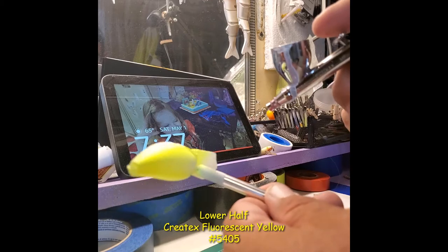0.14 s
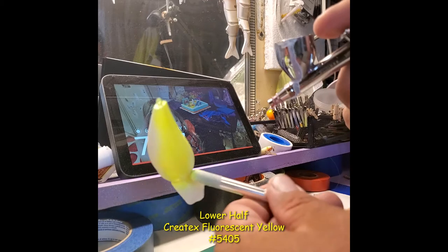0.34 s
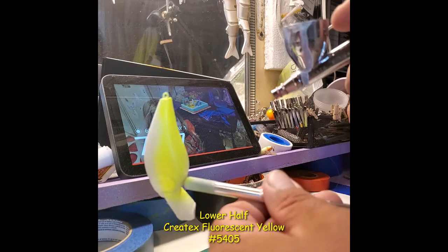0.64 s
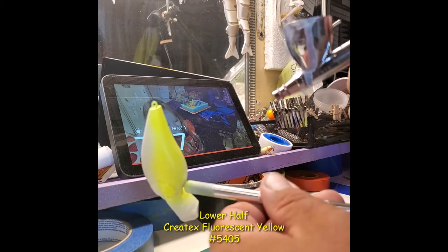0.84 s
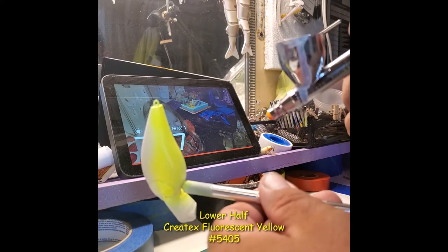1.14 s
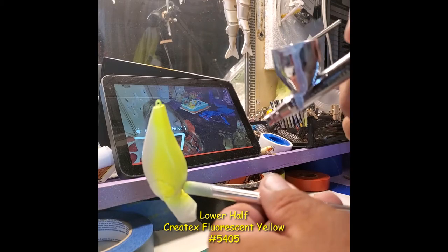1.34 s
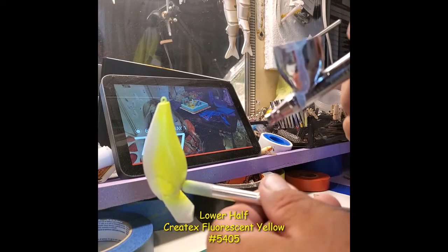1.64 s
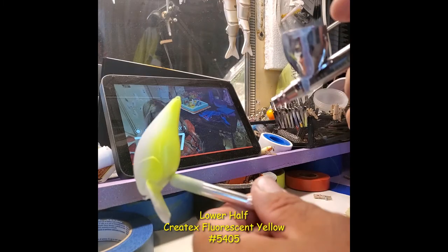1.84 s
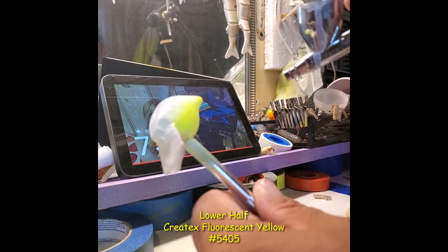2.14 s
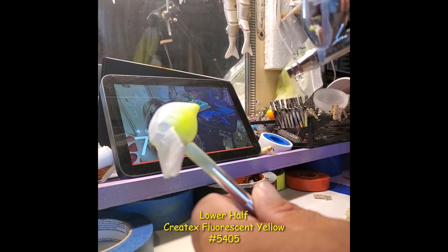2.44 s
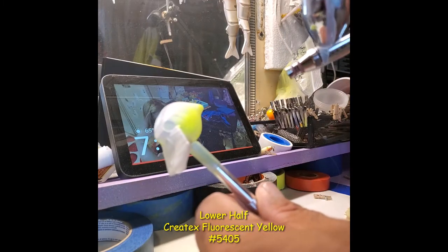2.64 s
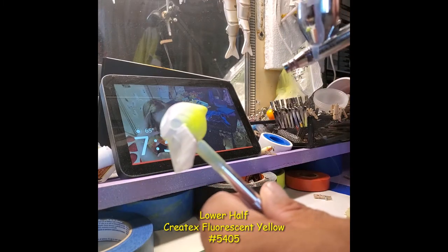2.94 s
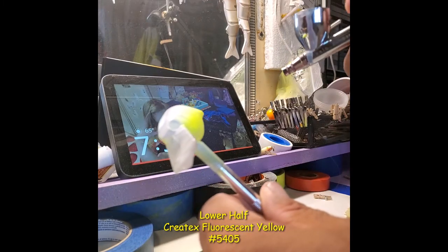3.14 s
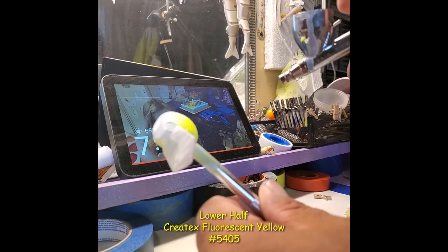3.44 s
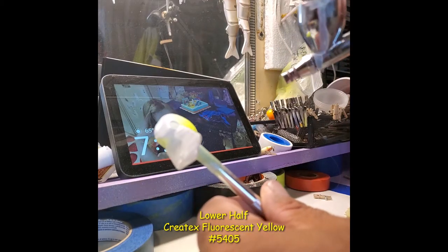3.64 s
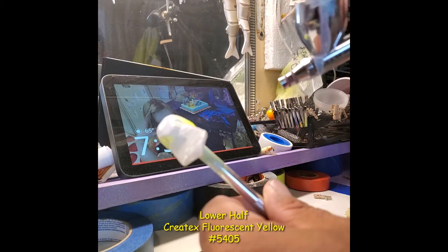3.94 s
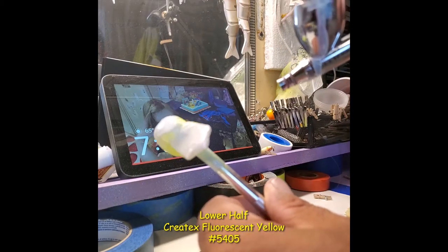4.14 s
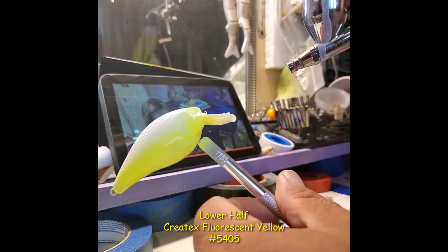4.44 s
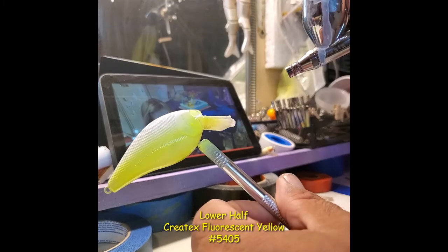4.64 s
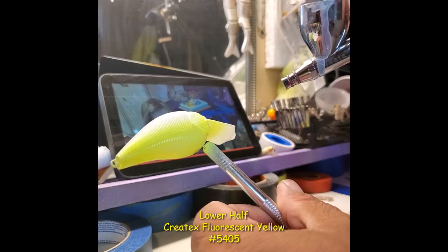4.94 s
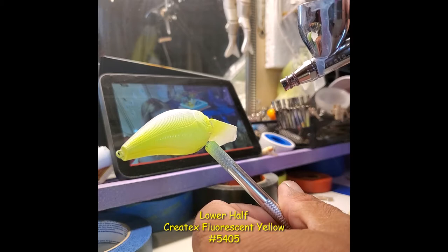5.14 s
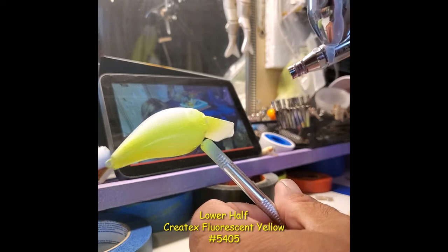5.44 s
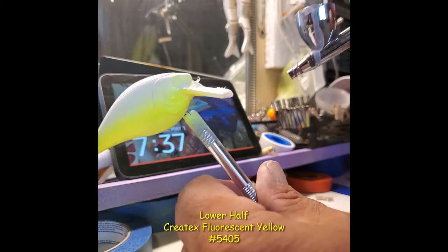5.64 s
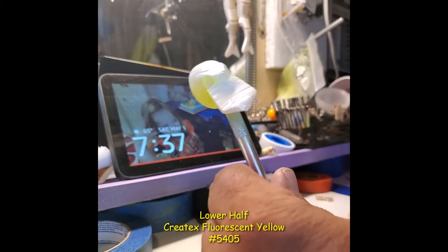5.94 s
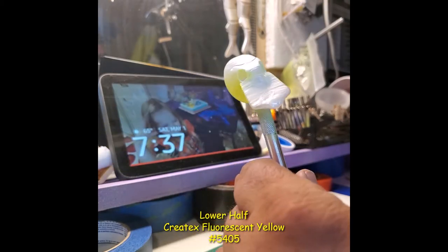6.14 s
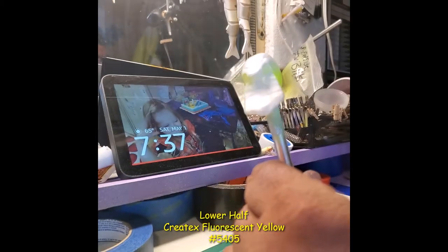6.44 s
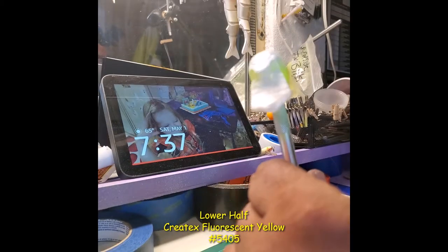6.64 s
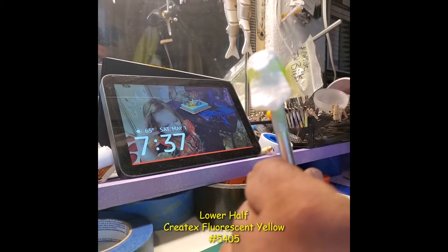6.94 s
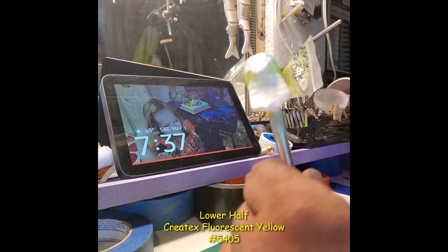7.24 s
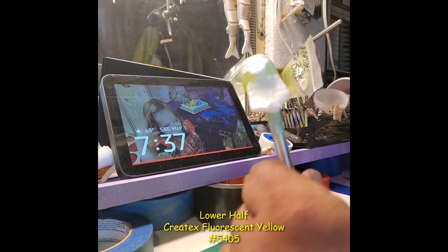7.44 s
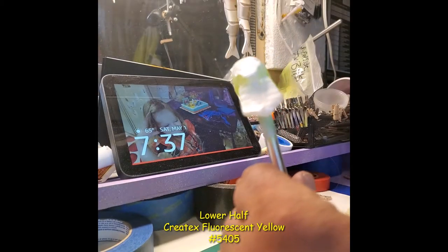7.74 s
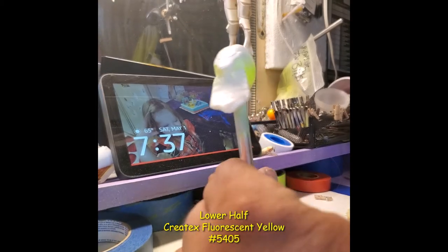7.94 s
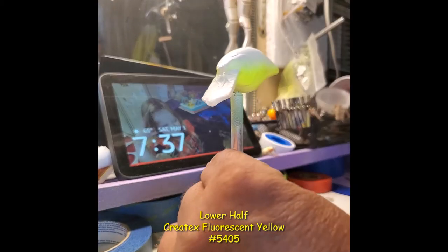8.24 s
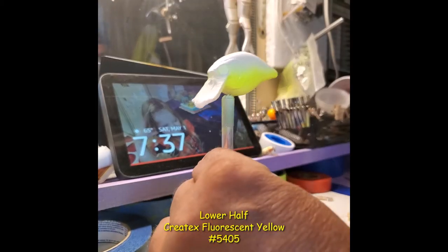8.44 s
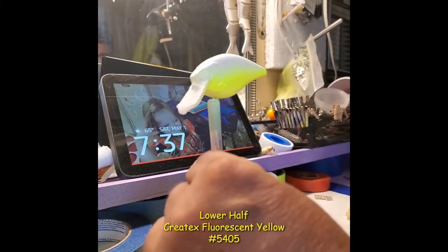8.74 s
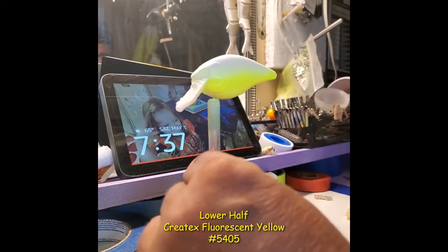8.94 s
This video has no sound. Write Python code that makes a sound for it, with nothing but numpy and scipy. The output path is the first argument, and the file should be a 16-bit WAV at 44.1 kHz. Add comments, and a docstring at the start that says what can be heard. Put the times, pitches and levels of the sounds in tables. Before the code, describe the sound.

At a quiet indoor workbench, an airbrush sprays a small lure in four bright hissing bursts, each starting thin then opening fuller, with a soft airy roar and a snap at release. A small compressor hums low and cuts in and out. Loose metal ticks rattle between sprays; later the brush knocks hard into its holder, followed by light dry finger taps. Close stereo microphone.

```python
"""At a workbench an airbrush sprays a fishing lure in four bursts, each first air alone, then opened wider.
Turbulent-jet noise gives the hiss, with echo combs, and a soft roar where the stream meets the lure.
A small piston compressor runs three times as harmonics of its stroke rate, with a rumble as it stops.
Damped modes and noise cracks make the trigger snaps, ticking metal, small clinks, finger taps and bumps.
The brush is knocked into its holder on the right; skin rubs on the lure's stick in a quiet room."""
import sys
import numpy as np
from scipy import signal
from scipy.fft import rfft, irfft
from scipy.io import wavfile

SR = 44100
rng = np.random.default_rng(int(sys.argv[2]) if len(sys.argv) > 2 else 0)


def master_out(mix):
    """Clip the mix to full scale and print it as 16-bit PCM to the path in sys.argv[1]."""
    frames = np.transpose(np.atleast_2d(mix))
    ceiling = np.clip(frames, -1, 1)
    pcm = np.round(ceiling * 32767).astype(np.int16)
    wavfile.write(sys.argv[1], SR, pcm)


N = 401310
TIME = np.arange(N) / SR

# Table levels are relative: each function applies its own gains. Balance is left minus right.
# direction of the hiss: f/Hz, balance/dB
JET_PAN = [(60, -2), (110, -8.5), (200, -4), (380, -8.5), (1290, -10), (2380, -6.5), (4400, -6.5),
           (8120, 4), (15000, 14)]
# spectrum of the pump on its feet: f/Hz, density level/dB
MOUNT = [(20, -3), (45, 5), (90, -4), (165, 0), (240, 3.5), (340, -21.5), (560, -9), (850, -18),
         (4000, -55)]
# spectrum of metal contacts: f/Hz, density level/dB
TICK_COLOUR = [(1060, -34), (1800, -21), (2860, -17), (4310, -11.5), (5610, -5.5), (7430, -14.5),
               (8750, -10.5), (10700, -12.5), (14700, -7)]
# how the hand holds the metal: from t/s, ring level/dB, T60/s, body level below 4500 Hz/dB, three modes f/Hz
GRIPS = [(.3, -5.5, 0.025, -5, 2870, 11600, 15000), (1.7, -0.5, 0.02, -2.5, 8870, 13600, 11200),
         (4.0, -1.5, 0.032, -7.5, 5590, 8840, 15000), (5.7, -5.5, 0.085, 1.5, 5717, 10100, 13150)]
# metal parts slide in the hand: start t/s, end t/s, level/dB
SLIDES = [(0.331, 0.525, -49), (1.878, 2.205, -47), (4.323, 4.375, -37.5), (4.424, 4.81, -45.5),
          (6.082, 6.224, -48.5), (6.48, 6.63, -46.5), (8.649, 8.697, -56), (8.792, 8.948, -59.5)]
# skin and sleeve rub on the stick: start t/s, end t/s, swish level/dB, crackle relative to swish/dB
RUBS = [(5.623, 5.795, -40.5, -12.5), (5.742, 5.962, -37.5, -14), (7.83, 8.52, -57, 2),
        (7.985, 8.397, -54.5, -1.5)]
# spectrum of dry cracks: f/Hz, density level/dB
TAP_COLOUR = [(300, -21.5), (700, -8), (970, -21), (1350, -8.5), (1800, -6.5), (3000, -4), (3900, -6),
              (4700, -0.5), (7500, -14.5), (10900, -10.5), (15800, -19)]
# modes of the stick: f/Hz, level/dB, T60/s
TAP_MODES = [(1364, -5, 0.054), (2910, -1, 0.043)]


def from_db(db):
    """Level to amplitude: 20 dB is a factor of ten."""
    return 10 ** (np.asarray(db) / 20)


def rms_one(x):
    """Normalisation to unit root-mean-square amplitude."""
    return x / np.sqrt(np.mean(x ** 2) + 1e-20)


def at_hz(points, hz):
    """Spectrum interpolated linearly in dB on a logarithmic frequency axis."""
    f, value = np.transpose(points)
    return np.interp(np.log(hz + 1e-3), np.log(f), value)


def pan(db):
    """Constant-power panning: gains of the left and right channels."""
    db = np.atleast_1d(db)
    gains = from_db(np.array([db, -db]) / 2)
    return gains / np.sqrt(np.mean(gains ** 2, axis=0))


def drift(rate_hz):
    """Low-passed random process of unit rms, 6 dB down at rate_hz."""
    f = np.fft.rfftfreq(N, 1 / SR)
    return rms_one(irfft(rfft(rng.standard_normal(N)) / (1 + (f / rate_hz) ** 2), N))


def noise(colour, balance=None, n=N, tilt_db=0):
    """Partly coherent stereo noise, shaped in frequency; the tilt is in dB per octave above 500 Hz."""
    # left-right coherence: f/Hz, correlation
    likeness = [(60, 0.13), (250, 0.76), (600, 0.67), (1200, 0), (4000, 0.033)]
    f = np.fft.rfftfreq(n, 1 / SR) + 1
    alike = at_hz(likeness, f)
    mid, side = rfft(rng.standard_normal((2, n)))
    pair = np.sqrt(1 + alike) * mid + np.sqrt(1 - alike) * side * [[1], [-1]]
    if balance is not None:
        pair = pair * pan(at_hz(balance, f))
    shape_db = at_hz(colour, f) + tilt_db * np.log2(np.maximum(f, 500))
    return rms_one(irfft(pair * from_db(shape_db), n))


def dying(t, t60):
    """Exponential damping: 60 dB of decay in t60 seconds."""
    return np.exp(-np.minimum(np.log(1000) * t / max(t60, 1e-4), 40))


def movement(start, end, rise_t60, fade_t60, t=TIME):
    """First-order onset and release: the gain approaches one, holds and decays."""
    return (1 - dying(np.maximum(t - start, 0), rise_t60)) * dying(np.maximum(t - end, 0), fade_t60)


def aim(s, width_s):
    """Gaussian weighting in time, 6 dB down at width_s from its top."""
    return .5 ** np.minimum(((TIME - s) / width_s) ** 2, 20)


def ring(modes, t, spread_db=2):
    """Modal superposition: damped sines with a random strength and sign in each ear."""
    shape = (len(modes), 2, 1)
    strength = from_db(rng.normal(0, spread_db, shape)) * rng.choice([-1, 1], shape)
    # long waves reach both ears alike
    long_wave = np.array(modes)[:, :1] < 900
    strength[:, 1] = np.where(long_wave, strength[:, 0], strength[:, 1])
    return sum(gain * from_db(db) * np.sin(2 * np.pi * hz * t) * dying(t, t60)
               for gain, (hz, db, t60) in zip(strength, modes))


def add(out, s, sound):
    """Linear superposition of a sound from time s."""
    start = int(s * SR)
    out[:, start:start + sound.shape[1]] += sound[:, :N - start]


def strikes(rows, colour, modes, crack_db, crack_t60, ring_db, room_db, room_t60,
            rise_t60=0.0018, patchy_db=4.5, detune=0.0064):
    """Impact excitation: a broadband crack, free modal ringing and a faint diffuse room tail."""
    out, t = np.zeros((2, N)), TIME[:2 ** 13]
    for s, level_db, side_db in rows:
        own_colour = [(hz, db + patchy_db * rng.standard_normal()) for hz, db in colour]
        burst = noise(own_colour, n=len(t))
        crack = from_db(crack_db) * burst * dying(t, crack_t60)
        # stretching time shifts pitch and decay together
        ringing = from_db(ring_db) * ring(modes, t * (1 + detune * rng.standard_normal()))
        tail = from_db(room_db) * burst * dying(t, room_t60)
        sound = (crack + ringing) * pan(side_db) + tail * pan(side_db / 2)
        add(out, s, from_db(level_db) * (1 - dying(t, rise_t60)) * sound)
    return out


def airbrush(jet_db=6.0, buffet_db=1, flutter_db=1.0, bounce=0.56, bounce_s=0.000677, close_t60=0.052,
             open_t60=0.011, gust_db=1.5, thin_db=-3.5, bench_echo=0.37, bench_s=0.0019, wall_s=0.0067):
    """Turbulent-jet noise: a two-stage hiss, comb-filtered by echoes, and a roar of impinging flow."""
    # trigger pulls: air on t/s, opened wide t/s, released t/s, first level/dB, wide level/dB
    bursts = [(.683, .903, 1.721, -38, -30), (2.313, 2.673, 3.132, -34.3, -29.2),
              (3.623, 3.866, 4.162, -38.8, -29.2), (4.819, 5.168, 5.428, -32.8, -28.4)]
    # hiss spectrum: f/Hz, density level/dB
    jet_colour = [(1290, -70), (2150, -36), (2480, -11.5), (2700, -16.5), (2880, -8), (3060, -14),
                  (3400, -5.5), (4100, -7), (4600, -13), (5000, -7), (9500, -6.5), (14000, 0.5),
                  (15100, 6.5), (15700, 2.5)]
    # roar spectrum: f/Hz, density level/dB
    buffet_colour = [(59, -30.5), (100, -3.5), (296, -0.5), (620, -0.5), (1090, -8), (1350, -3),
                     (1900, -15), (2470, -35.5), (4180, -120)]
    # rush spectrum: f/Hz, density level/dB
    rush_colour = [(600, -25), (900, -1), (1350, 0.5), (2500, -12), (8000, -33.5)]
    # the air cone sweeps over the lure, deepest on its broad flank, brightest on its edge:
    # best aim t/s, roar level/dB, 6 dB half-width/s (sign ignored), bass and rush relative to roar/dB
    sweeps = [(.85, -59, -0.04, 12.5, -20), (1.36, -41, 0.51, 0.5, -23), (2.5, -46.5, 0.46, 3.5, -20),
              (4.05, -40.5, 0.2853, -13, -11.5), (4.86, -41, 0.17, -36, -0.5),
              (5.18, -45.5, 0.25, -5.5, -24)]
    flow, air_on, air_only = np.zeros((3, N))
    for on, wide, off, first_db, wide_db in bursts:
        valve = movement(on, off, open_t60, close_t60)
        needle = 1 - dying(np.maximum(TIME - wide, 0), 2 * open_t60)
        flow += valve * from_db(first_db + needle * (wide_db - first_db))
        air_on += valve
        air_only += valve * (1 - needle)
    jet = noise(jet_colour, JET_PAN)
    # an echo off the moving lure and hand sweeps a shallow comb through the hiss
    delay = bounce_s * (1 + 0.191 * drift(0.81))
    echo = np.array([np.interp(TIME - delay, TIME, ear) for ear in jet])
    # fixed echoes off the bench and the wall add a finer ripple
    off_bench = np.roll(jet, int(bench_s * SR), axis=1)
    off_wall = np.roll(jet, int(wall_s * SR), axis=1)
    jet = rms_one(jet + bounce * echo + bench_echo * (off_bench - off_wall))
    impact = sum(from_db(db) * aim(s, width) for s, db, width, _, _ in sweeps)
    depth = sum(from_db(db + bass_db) * aim(s, width) for s, db, width, bass_db, _ in sweeps)
    edge = sum(from_db(db + rush_db) * aim(s, width) for s, db, width, _, rush_db in sweeps)
    # a harder impact fills the lower part of the hiss; air alone is thinner
    band = signal.butter(2, [2300, 4800], "band", fs=SR, output="sos")
    splash = signal.sosfiltfilt(band, jet)
    splash_db = 0.4 * (np.maximum(20 * np.log10(impact), -49) + 47.0) + thin_db * air_only
    jet = jet + splash * (from_db(splash_db) - 1)
    hiss = jet * flow * from_db(jet_db + flutter_db * drift(36))
    eddies = noise(buffet_colour)
    deep = signal.sosfiltfilt(signal.butter(2, 300, fs=SR, output="sos"), eddies)
    roar = (eddies - deep) * impact + deep * depth + noise(rush_colour) * edge
    roar = roar * air_on * from_db(buffet_db + gust_db * drift(21.0))
    return hiss + roar * pan(-5.0)


def compressor(hum_db=-37.5, rattle_db=-49.5, puff_db=-52, whine_db=-50.5, leak_db=-59, throb_db=1.5,
               coast_t60=.24, waver_db=1.0, rumble_db=-56, stroke_spread_db=.5):
    """Periodic excitation: piston strokes yield harmonics, casing rattle and amplitude-modulated puffs."""
    # runs: motor on t/s, full level t/s, motor off t/s, time of one stroke t/s, stroke rate f/Hz
    runs = [(-.6, -.3, .213, .0072, 29.18), (1.27, 1.52, 3.455, 1.466, 29.19),
            (4.88, 5.12, 6.2, 5.068, 29.16)]
    # low throb: multiple of the stroke rate, level/dB
    hum_orders = [(1, -9.5), (2, 4), (3, -0.5), (5, -14), (6, -5.5), (7, -19), (8, -12.5)]
    # casing resonances: f/Hz, density level/dB
    casing_colour = [(200, -11.5), (300, -15), (360, -3), (480, -8.5), (620, 5.5), (760, -2.5), (940, 4),
                     (1130, -12.5), (1300, 2.5), (1500, -1), (1730, 5), (1900, -15), (2600, -13.5),
                     (4500, -28)]
    # whine: multiple of the stroke rate, level/dB
    whine_orders = [(16, -8), (18, -6), (19, -5), (21, 0), (23, -6), (32, -5.5), (59, -10.5)]
    # air leak spectrum: f/Hz, density level/dB
    leak_colour = [(1500, -8), (2800, 3.5), (9000, -10), (15000, -12)]
    running, turn = np.zeros(N), np.zeros(N)
    for on, loaded, off, stroke_s, per_s in runs:
        spin_up = np.clip((TIME - on) / (loaded - on), 0, 1) ** 2
        running += spin_up * dying(np.maximum(TIME - off, 0), coast_t60)
        turn = np.where(TIME > on, 2 * np.pi * per_s * (TIME - stroke_s), turn)
    cycle = np.linspace(0, 2 * np.pi, 2048)

    def each_stroke(orders, scatter):
        """Fourier series over one crank turn, in step (scatter 0) or in any phase (scatter 1)."""
        wave = sum(from_db(db) * np.cos(round(k) * cycle + scatter * rng.uniform(0, 2 * np.pi))
                   for k, db in orders)
        return np.interp(turn % (2 * np.pi), cycle, rms_one(wave))

    panels = [(k, at_hz(casing_colour, k * runs[-1][4])) for k in range(10, 64)]
    rattle = np.array([each_stroke(panels, 0.86), each_stroke(panels, 1)])
    # outlet and intake open in turn
    opening = np.cos(turn - .6) + .5 * np.cos(2 * turn)
    valves = rms_one(from_db(throb_db * opening + drift(7.8)))
    casing = (from_db(rattle_db) * rattle + from_db(puff_db) * noise(casing_colour)) * valves
    whine = from_db(whine_db + waver_db * drift(0.48)) * each_stroke(whine_orders, 1.0)
    leak = from_db(leak_db) * noise(leak_colour, JET_PAN)
    # the throb's level wanders slightly
    hum = from_db(hum_db + stroke_spread_db * drift(8)) * each_stroke(hum_orders, 0)
    rumble = from_db(rumble_db) * noise(MOUNT)
    return running * (hum + rumble + (casing + whine) * pan(-3.5) + leak)


def shudder(rise_t60=0.014, t60=0.33):
    """Damped random vibration: a dull rumble dies away as the pump rocks on its rubber feet."""
    # the pump rocks as it stops: t/s, level/dB
    shudders = [(0.331, -42), (3.572, -41), (6.293, -35.5)]
    out, t = np.zeros((2, N)), TIME[:2 ** 15]
    for s, level_db in shudders:
        envelope = (1 - dying(t, rise_t60)) * dying(t, t60)
        add(out, s, from_db(level_db) * noise(MOUNT, n=len(t)) * envelope * pan(-1.7))
    return out


def valve_snaps():
    """Impact of the trigger valve snapping as it opens or shuts, which excites its damped modes."""
    # snaps, the first on opening, the others on shutting: t/s, level/dB, balance/dB
    snaps = [(0.6933, -32.5, -3), (1.7504, -26, -4), (3.1573, -23, -6.5), (4.1937, -18.5, -9),
             (5.451, -21.5, -11)]
    # modes of the valve: f/Hz, level/dB, T60/s
    valve_modes = [(2880, 4, 0.021), (3230, -2, 0.022), (3550, 6, 0.017), (5700, -19, 0.082),
                   (8780, -12, 0.14)]
    return strikes(snaps, TAP_COLOUR, valve_modes, crack_db=-3.5, crack_t60=0.013,
                   ring_db=-6.5, room_db=-19, room_t60=0.15)


def knocks(rattle_t60=0.079, room_db=-13, room_t60=0.2, rise_t60=0.0025, lowest_hz=80, snap_db=-33):
    """Impulsive modal excitation of the holder, band-limited by how hard the contact is."""
    # the brush lands in its holder: t/s, level/dB, balance/dB, brightness/(dB per octave),
    # top of the contact f/Hz, loose rattle level/dB, level of the mode near 540 Hz/dB
    landings = [(7.019, -10.5, -15, 3, 6630, -10.5, -5), (7.0232, -9, -13.5, -1, 4100, -6, 3.5),
                (7.0266, -17, -10, 0.5, 3010, -5, 2), (7.077, -22.5, -16, 0.5, 6100, -8.5, 1),
                (7.1796, -7.5, -17, -1, 2560, -18, -8)]
    # rattle spectrum: f/Hz, density level/dB
    knock_colour = [(88, -13.5), (170, 0), (545, -8), (1140, -11.5), (1910, -23), (2400, -16.5),
                    (5740, -23.5), (7300, -34)]
    # modes of the holder: f/Hz, level/dB, T60/s
    holder_modes = [(180, -12.5, 0.06), (276, -9.5, 0.04), (541, -2.5, 0.041), (744, -3.5, 0.023),
                    (1310, -3, 0.017), (1680, -10, 0.02), (2330, -8.5, 0.025), (2840, -9.5, 0.017),
                    (3620, -8.5, 0.013), (5020, -5.5, 0.0091), (5750, -6.5, 0.013)]
    out, t = np.zeros((2, N)), TIME[:2 ** 14]
    for s, level_db, side_db, tilt_db, top_hz, rattle_db, hollow_db in landings:
        body = 0
        for k, (hz, db, t60) in enumerate(holder_modes):
            mode_db = db + tilt_db * np.log2(hz / 1000) + hollow_db * (450 < hz < 650)
            # one push wakes all modes together, with alternating signs
            body = body + (-1) ** k * from_db(mode_db) * np.sin(2 * np.pi * hz * t) * dying(t, t60)
        burst = from_db(rattle_db) * noise(knock_colour, n=len(t), tilt_db=tilt_db)
        direct = (body + burst * dying(t, rattle_t60)) * pan(side_db)
        tail = from_db(room_db) * burst * dying(t, room_t60) * pan(side_db / 2)
        contact = signal.butter(3, [lowest_hz, top_hz], "band", fs=SR, output="sos")
        thud = signal.sosfilt(contact, (direct + tail) * (1 - dying(t, rise_t60)))
        # the brush's own metal parts
        snap = from_db(snap_db + 2 * tilt_db + rattle_db / 2) * noise(TICK_COLOUR, n=len(t))
        snap = snap * dying(t, rattle_t60) * pan(side_db / 2)
        add(out, s, from_db(level_db) * (thud + snap))
    return out


def grip_at(s):
    """Piecewise-constant boundary condition: the grip in force at time s."""
    return GRIPS[max(sum(row[0] <= s for row in GRIPS) - 1, 0)]


def ticks(rows, upper_db=-5):
    """Impacts of small metal parts, whose spectrum, modes and damping depend on the grip."""
    out = 0
    for grip in GRIPS:
        _, ring_db, t60, body_db, first_hz, *upper = grip
        colour = [(hz, db + body_db * (hz < 4500)) for hz, db in TICK_COLOUR]
        modes = [(first_hz, ring_db, t60)] + [(hz, ring_db + upper_db, t60) for hz in upper]
        held = [row for row in rows if grip_at(row[0]) is grip]
        out = out + strikes(held, colour, modes, crack_db=-1.0, crack_t60=0.013,
                            ring_db=-8.5, room_db=-21.5, room_t60=0.16)
    return out


def stutter(rows, onset_db=-21, onset_s=0.002, rebound_db=-9, rebound_s=0.0035):
    """Repeated impact of loose parts: the hit and a rebound, the attack softened by a faint onset."""
    out = []
    for (s, level_db, side_db), (early, late) in zip(rows, rng.uniform(.5, 1.5, (len(rows), 2))):
        out.append((s - early * onset_s, level_db + onset_db, side_db))
        out.append((s, level_db, side_db))
        out.append((s + late * rebound_s, level_db + rebound_db, side_db))
    return out


def loose_ticks():
    """Impact and rebound: the sharpest ticks of the metal parts in the hand."""
    # ticks: t/s, level/dB, balance/dB
    sharpest = [(0.3539, -22.5, 3), (0.3721, -23, 10), (0.4183, -17, 4), (0.4234, -25.5, -3),
                (0.432, -20.5, 7), (0.4723, -21, 4), (1.9642, -21, 0), (2.0272, -22.5, 11),
                (2.1271, -26.5, 13), (4.2243, -22, -1.0), (4.2612, -18, 0), (4.3048, -12, -2),
                (4.314, -19, 0), (4.3365, -14.5, -6), (4.3402, -17, -5), (4.3554, -21, 8),
                (4.3604, -17.5, -5), (4.3685, -21, 3), (4.3896, -19, 6.5), (4.4243, -22.5, 3),
                (4.4413, -16.5, 2), (4.4562, -23, 0.5), (4.5042, -19, -2.5), (4.5527, -25.5, 3),
                (4.6553, -15, 1), (4.6833, -14.5, 2), (4.735, -15, 10), (4.7514, -23.5, 2),
                (5.8664, -26.5, 2), (6.0551, -28.5, -3), (6.1105, -23, 0), (6.1394, -24.5, -3),
                (6.1643, -25, 0), (6.36, -31.5, -6), (6.4002, -27, -4), (6.4877, -29.5, 4),
                (6.5678, -24, 8)]
    return ticks(stutter(sharpest))


def slides(scrape_db=-1, grain_db=4, sing_per_s=11, sing_q=22, sing_fade_t60=0.32,
           rise_t60=0.013, fade_t60=0.14):
    """Friction noise: tiny slips drive resonances, stronger the longer the grip lets them ring."""
    out = np.zeros((2, N))
    scrape = noise(TICK_COLOUR) * rms_one(from_db(grain_db * drift(90.3)))
    for start, end, db in SLIDES:
        _, ring_db, t60, _, first_hz, second_hz, _ = grip_at(start)
        part = slice(int(start * SR), int((end + sing_fade_t60) * SR))
        rubbing, t = scrape[:, part], TIME[part]
        sing = rms_one(sum(signal.lfilter(*signal.iirpeak(hz, sing_q, fs=SR), rubbing) * first_hz / hz
                           for hz in (first_hz, second_hz)))
        slips = from_db(scrape_db) * rubbing * movement(start, end, rise_t60, fade_t60, t) * pan(3.4)
        song = from_db(ring_db) * sing_per_s * t60 * sing
        song = song * movement(start, end, rise_t60, sing_fade_t60, t)
        add(out, start, from_db(db) * (slips + song))
    return out


def small_clinks():
    """Impacts ringing in two damped modes: the lure's clip and the pump's pressure switch."""
    clinks = [(.183, -29, 8), (.5791, -28.5, -5), (1.814, -24, -4), (1.8421, -30, -6), (3.421, -31.5, -1),
              (8.493, -29.5, 1), (8.51, -26.5, -7), (8.6986, -28, 0), (8.9476, -36, 3)]
    # modes of the clinks: f/Hz, level/dB, T60/s
    clink_modes = [(4610, -2.5, 0.028), (5610, -2, 0.023)]
    return strikes(clinks, TAP_COLOUR, clink_modes, crack_db=-5, crack_t60=0.01,
                   ring_db=-2.5, room_db=-14.0, room_t60=0.11)


def taps(rows):
    """Strongly damped impacts: fingers and stick give short, dry cracks."""
    return strikes(rows, TAP_COLOUR, TAP_MODES, crack_db=2.5, crack_t60=0.0071,
                   ring_db=-13.5, room_db=-22, room_t60=0.105)


def finger_taps():
    """Strongly damped impacts: the clearest cracks of fingers on the stick."""
    # cracks: t/s, level/dB, balance/dB
    clearest = [(0.7996, -24, -13), (5.5197, -29.5, -18), (5.6735, -27.5, 0), (7.8922, -27, -12),
                (7.905, -30, -27), (7.9105, -24.5, -13), (8.1012, -24, -26), (8.2073, -21.5, -24),
                (8.2362, -27.5, -13), (8.3286, -25, -28)]
    return taps(clearest)


def catches(moves, per_s, above_db, spread_db, side_db, side_spread_db):
    """Stick-slip at uneven intervals, harder in a stronger move; at most 32 catches in each move."""
    rows, gap = [], 1 / per_s
    for (start, end, level_db), draws in zip(moves, rng.uniform(-1, 1, (len(moves), 32, 3))):
        for k, (late, hard, side) in enumerate(draws):
            s = start + gap * (k + .5 + .5 * late)
            if s < end:
                rows.append((s, level_db + above_db + spread_db * hard, side_db + side_spread_db * side))
    return rows


def chatter():
    """Stick-slip impacts: slides shed lesser ticks, and crackling rubs lesser taps."""
    rolling = [(start, end, db + crackle_db) for start, end, db, crackle_db in RUBS]
    metal = catches(SLIDES, per_s=37, above_db=12, spread_db=9.0, side_db=1.0, side_spread_db=11.0)
    fingers = catches(rolling, per_s=49, above_db=15.5, spread_db=4, side_db=-12, side_spread_db=8)
    return ticks(metal) + taps(fingers)


def handling(grain_db=7, squeak_q=22, uneven_db=2.5, stick_q=9, stick_db=-5, swell=0.61):
    """Friction of skin on the stick: a swish, crackle filtered by resonances and a narrow-band squeak."""
    # rub spectrum: f/Hz, density level/dB
    rub_colour = [(120, -16), (250, -4), (390, -14), (479, -6), (780, -4.5), (990, -16), (1280, -5),
                  (1500, -15), (2240, -17), (2900, -10.5), (3880, -18.5), (4500, -17), (5600, -18),
                  (7820, -29.5), (15000, -31)]
    # direction of the hand: f/Hz, balance/dB
    hand_pan = [(500, -16.5), (6000, -9.5), (14000, 12)]
    # a finger squeaks as the stick is turned: loudest t/s, 6 dB half-width/s, f/Hz, level/dB
    squeaks = [(7.65, .12, 3880, -62)]
    swish = noise(rub_colour, hand_pan) * from_db(uneven_db * drift(20))
    slips = noise(TAP_COLOUR, hand_pan) * rms_one(from_db(grain_db * np.minimum(drift(120), 3)))
    ringing = rms_one(sum(from_db(db) * signal.lfilter(*signal.iirpeak(hz, stick_q, fs=SR), slips)
                          for hz, db, _ in TAP_MODES))
    crackle = rms_one(slips + from_db(stick_db) * ringing)
    out = 0
    for start, end, db, crackle_db in RUBS:
        arch = np.sin(np.pi * np.clip((TIME - start) / (end - start), 0, 1))
        # swell 0 would be even pressure, 1 a full arch
        pressure = np.maximum(arch, 0) ** swell
        out = out + from_db(db) * pressure * (swish + from_db(crackle_db) * crackle)
    for s, width_s, hz, db in squeaks:
        peak = signal.iirpeak(hz, squeak_q, fs=SR)
        squeak = rms_one(signal.lfilter(*peak, signal.lfilter(*peak, swish)))
        out = out + from_db(db) * aim(s, width_s) * squeak
    return out


def bumps(rise_t60=0.032, side_db=-17.0):
    """Slow-onset excitation of the bench, which wakes only its low modes."""
    # soft bumps: t/s, level/dB
    pushes = [(7.08, -17), (8.468, -26.5)]
    # modes of the bench: f/Hz, level/dB, T60/s
    bench_modes = [(87.5, 0.5, 0.1), (124, -3.5, 0.092)]
    out, t = np.zeros((2, N)), TIME[:2 ** 14]
    for s, level_db in pushes:
        push = ring(bench_modes, t) * (1 - dying(t, rise_t60))
        add(out, s, from_db(level_db) * push * pan(side_db))
    return out


def quiet_room(level_db=-56):
    """Stationary background noise with a fixed spectrum."""
    # room spectrum: f/Hz, density level/dB
    room_colour = [(29, -33), (50, -2), (177, -15.5), (214, -23.5), (471, -6), (724, -12), (816, -17.5),
                   (1350, -15), (1880, -20.5), (2760, -20), (7330, -34), (8870, -41.5), (15000, -44)]
    # direction of the background: f/Hz, balance/dB
    room_pan = [(5000, -4), (14000, 5.5)]
    return from_db(level_db) * noise(room_colour, room_pan)


def scene():
    """Linear superposition of spray, pump, small contacts and the quiet room."""
    spray = airbrush() + valve_snaps()
    pump = compressor() + shudder()
    metal = knocks() + loose_ticks() + slides() + small_clinks()
    hand = finger_taps() + chatter() + handling()
    return spray + pump + metal + hand + bumps() + quiet_room()


def record(dry, port_hz=8100, port_width_hz=1500, port_depth=0.54, cutoff_hz=15760):
    """Partial cancellation at the right microphone port, peak clipping and a steep low-pass."""
    port = signal.iirpeak(port_hz, port_hz / port_width_hz, fs=SR)
    right = dry[1] - port_depth * signal.lfilter(*port, dry[1])
    clipped = np.clip([dry[0], right], -.93, .93)
    top_cut = signal.ellip(12, .1, 80, cutoff_hz, fs=SR, output="sos")
    return signal.sosfilt(top_cut, clipped)


dry = scene()
out = record(dry)
master_out(out)
```